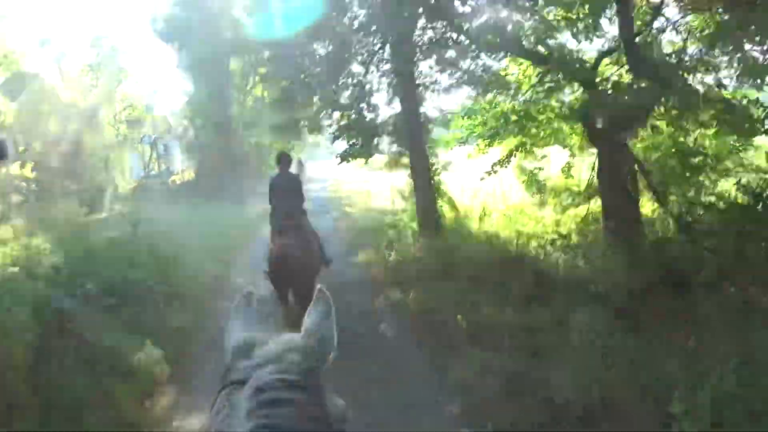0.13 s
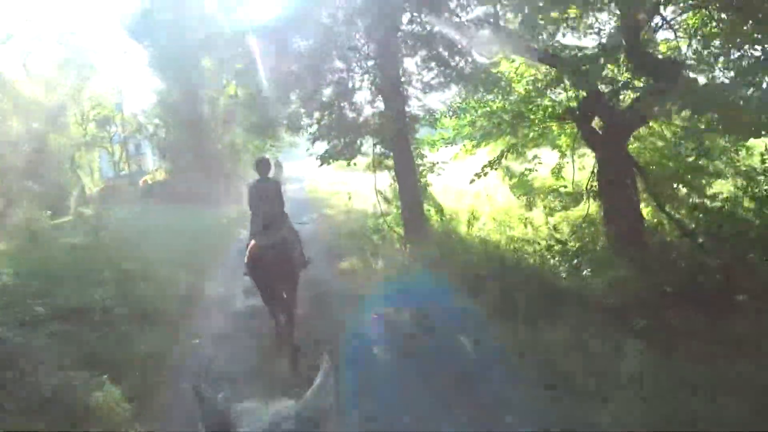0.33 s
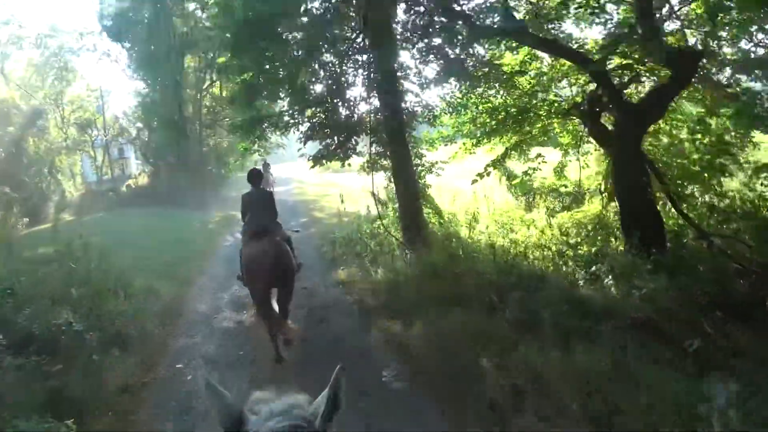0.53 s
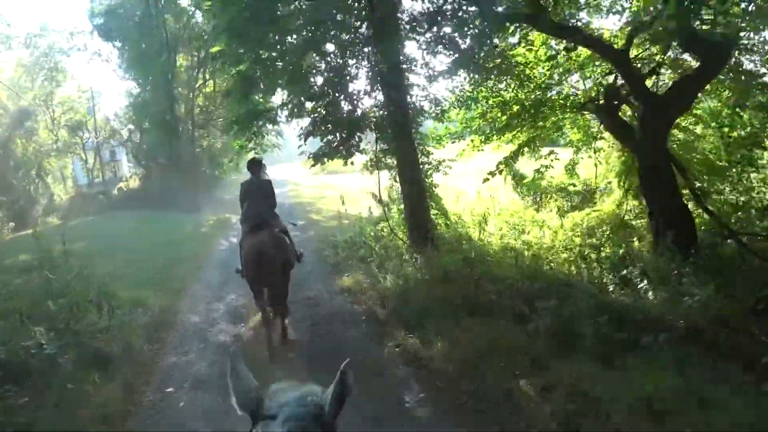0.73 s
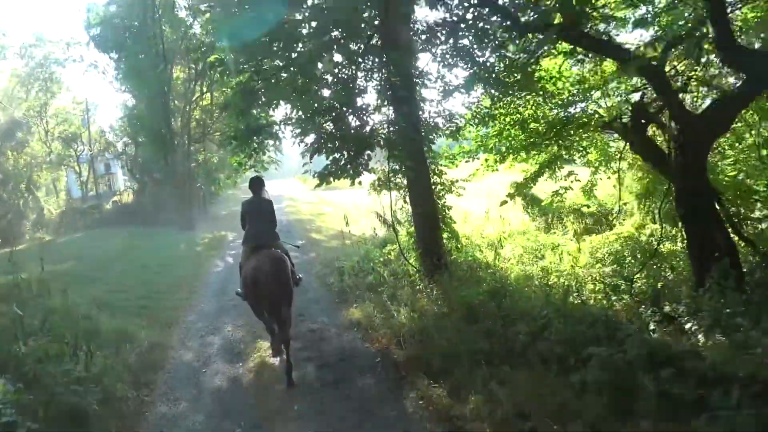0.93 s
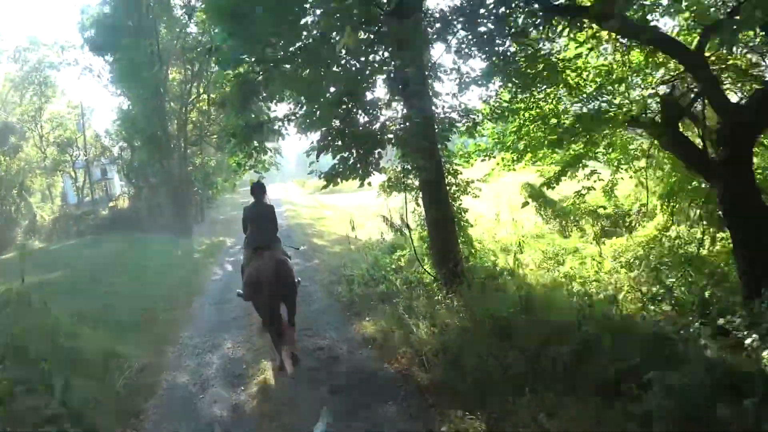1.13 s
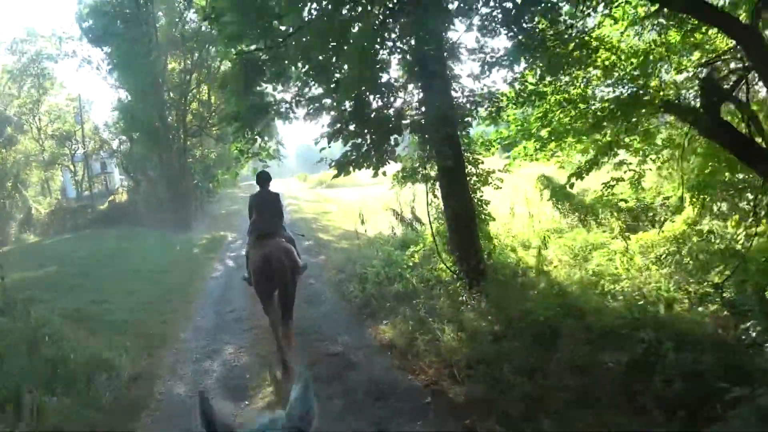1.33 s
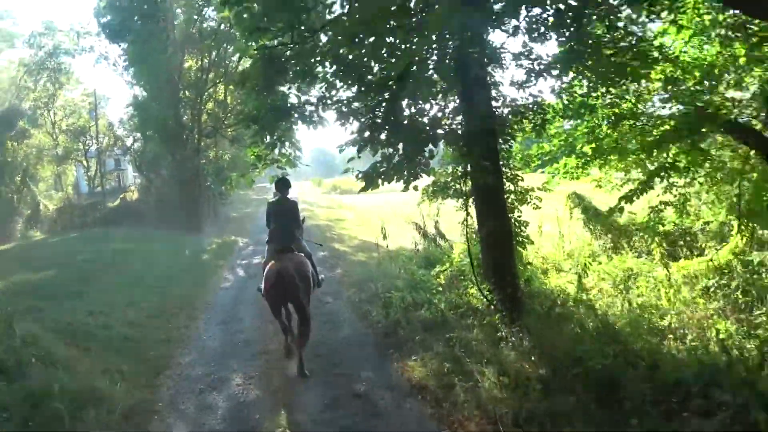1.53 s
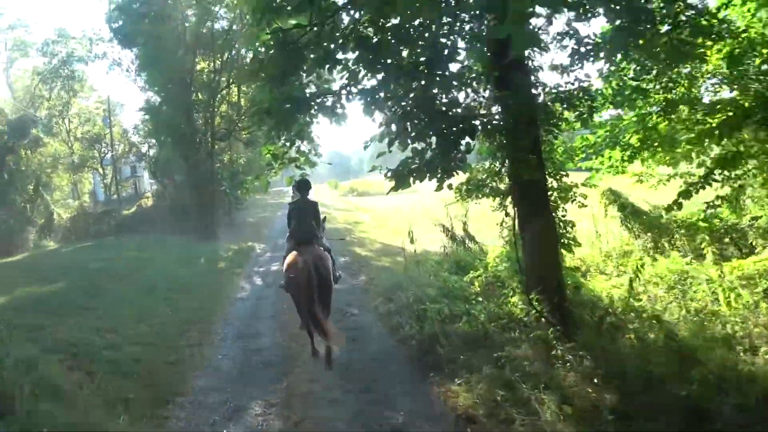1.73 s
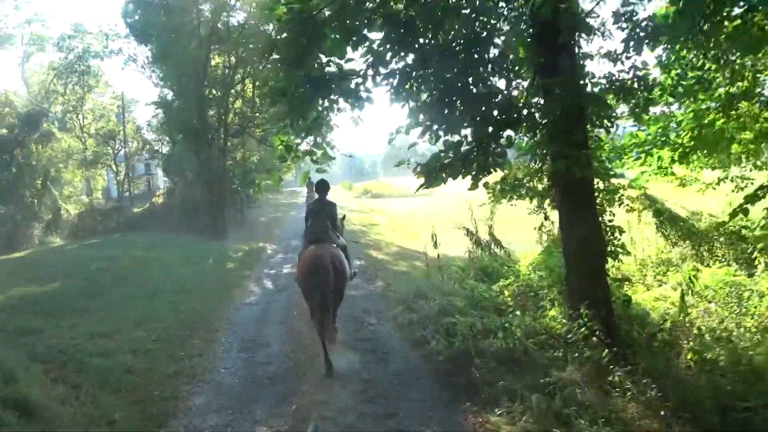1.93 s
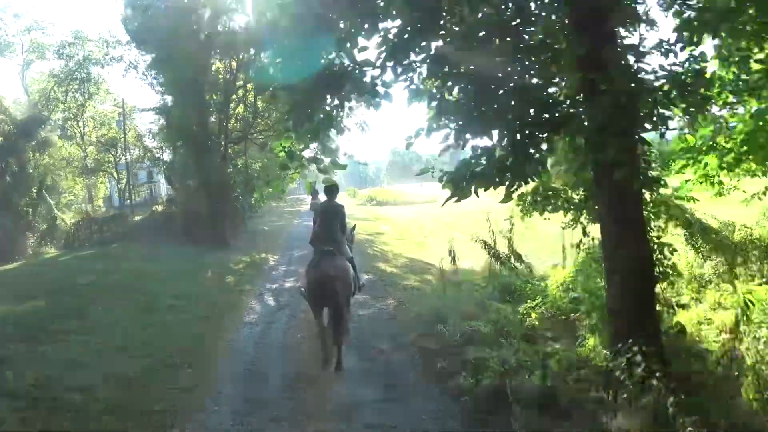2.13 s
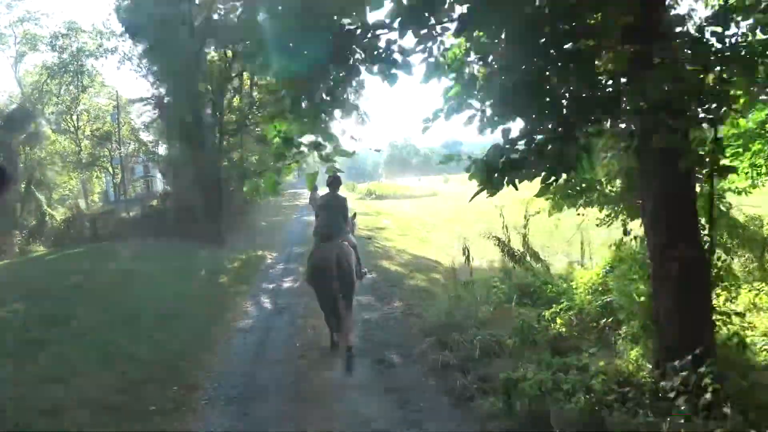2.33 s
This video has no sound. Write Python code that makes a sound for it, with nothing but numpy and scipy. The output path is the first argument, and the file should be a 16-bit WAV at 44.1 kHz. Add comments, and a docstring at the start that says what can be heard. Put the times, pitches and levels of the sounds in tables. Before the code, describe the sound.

Hoofbeats of two ridden horses crunch and knock briskly along a dirt and gravel lane

```python
"""Two horses move briskly along a dirt and gravel lane, heard from the saddle of the second.
From the start insects hiss in the trees, air and tread form a soft bed and loose gravel rolls (dense clicks).
The first knock of shoe on stone (a decaying sine and a crack) comes at once, then hooves crunch (click bursts)
and thud (low noise); from 0.4 s grit sprays and pebbles tick, and the loudest knock follows at 1.24 s.
One pebble pings at 1.6 s; a last crunch and spray close. The pair hears ground mids almost in opposite phase."""
import sys
import numpy as np
from scipy.fft import rfft, irfft
from scipy.io import wavfile
from scipy.ndimage import uniform_filter1d

SR = 44100
rng = np.random.default_rng(int(sys.argv[2]) if len(sys.argv) > 2 else 0)


def store_wav(level_fs):
    """Save 16-bit WAV to argv[1]."""
    pcm = np.round(np.clip(np.atleast_2d(level_fs), -1, 1) * 32767)
    wavfile.write(sys.argv[1], SR, pcm.T.astype(np.int16))


N = 104384
TIME = np.arange(N) / SR
HZ = np.maximum(np.arange(N // 2 + 1) * SR / N, 1)

# hooves pressing into gravel: peak t/s, level/dB, rise constant/s, fall constant/s, treble re level/dB
CRUNCHES = [(0.098, -36, 0.0058, 0.029, -25), (0.14, -33, 0.036, 0.025, -12),
            (0.181, -37, 0.034, 0.03, -21), (0.462, -37, 0.039, 0.031, -1.5),
            (0.507, -37.5, 0.01, 0.0085, -25), (0.606, -31.5, 0.0058, 0.014, -10),
            (.703, -39, 0.019, 0.037, -7), (0.795, -34.5, 0.02, 0.016, 1),
            (0.927, -30.5, 0.0086, 0.021, 0.5), (1.095, -42, 0.15, 0.008, -20),
            (1.150, -33, 0.022, 0.019, -5.5), (1.247, -36.5, 0.019, 0.027, -10),
            (1.418, -36, 0.043, 0.07, -4), (1.568, -36.5, 0.012, 0.0073, -21),
            (1.686, -38, 0.015, 0.0033, 1.5), (1.780, -30.5, 0.0084, 0.014, 0),
            (1.804, -25, 0.0048, 0.0048, -9.5), (1.835, -37.5, 0.0086, .008, 2.5),
            (1.89, -36, 0.018, 0.0098, -5), (2.037, -35.5, 0.036, 0.024, -8),
            (2.109, -31.5, 0.019, 0.016, -0.5), (2.355, -34.5, 0.029, 0.0045, 0)]
# spectrum of gravel: f/Hz, relative density/dB
GRAVEL = [(60, -65), (200, -21.5), (400, -4.5), (650, 0), (1000, 2), (1270, -3.5), (1520, -8.5),
          (2100, -9.5), (2850, -19.5), (3400, -17.5), (4100, -24), (6000, -30), (9000, -46), (16000, -78)]
TREBLE_HZ = 2050   # above it the small stones of a crunch are heard


def crunches():
    """Granular friction: each hoof grinds a burst of stones, with more or less fine gravel among them."""
    clicks = mixed_stones(count=5)
    coarse = swells([(s, db, rise, fall) for s, db, rise, fall, treble in CRUNCHES])
    fine = swells([(s, db + treble, rise, fall) for s, db, rise, fall, treble in CRUNCHES])
    low_share = 1 / (1 + (HZ / TREBLE_HZ) ** 6)
    spectrum = rfft(coarse * clicks) * low_share + rfft(fine * clicks) * (1 - low_share)
    return heard(colour(irfft(spectrum, N), GRAVEL))


# weight landing on the earth: peak t/s, level/dB, rise constant/s, fall constant/s
THUDS = [(.095, -44, 0.022, 0.0077), (.285, -45.5, 0.02, 0.039), (.612, -43, 0.021, 0.032),
         (.760, -40, 0.0087, 0.0035), (.940, -46, 0.019, 0.089), (1.102, -36.5, 0.018, 0.01),
         (1.355, -42.5, 0.037, 0.027), (1.620, -42, 0.0027, 0.0081), (1.690, -48, 0.029, 0.046),
         (1.822, -52, .015, 0.0083), (2.145, -49.5, 0.02, 0.041), (2.227, -41, 0.011, 0.0082),
         (2.256, -36.5, 0.0041, 0.014), (2.285, -41, 0.012, 0.037)]
# spectrum of packed earth: f/Hz, relative density/dB
EARTH = [(25, -90), (45, -32), (80, -13.5), (130, -5.5), (210, -2), (330, -5), (500, -12.5), (1000, -27),
         (3000, -56)]
TREAD_DB, CLODS_PER_S = -54.5, 1300   # steady rumble; rate of contacts
THUD_SCATTER_DB, THUD_LEAD_S = -6.5, 0.00062   # scattered re direct; left leads right


def thuds():
    """Low-frequency impact: dull pushes of the hooves on packed earth, over the low rumble of the ride."""
    level = np.hypot(swells(THUDS), from_db(TREAD_DB))
    earth = colour(level * grains(CLODS_PER_S, spread_db=2.5), EARTH)
    direct = pair(earth[0], 2 * np.pi * HZ * THUD_LEAD_S, 0)
    return direct + from_db(THUD_SCATTER_DB) * earth[1:]


# a shoe knocks a stone or hard earth: onset t/s, level/dB, f/Hz, rise/cycles, crack re level/dB
KNOCKS = [(.0435, -27, 730, 1.2, -4), (.0925, -31.5, 636, 1.9, -29), (.1445, -24.5, 1200, 2, -17),
          (0.178, -25.5, 1290, 2.6, -28), (.286, -29, 1030, 0.62, -3), (.305, -28.5, 1870, 1, -3),
          (.3146, -28, 840, 1.4, -14), (.4555, -29, 610, 0.87, -11), (.6045, -26, 590, 0.87, -15),
          (.9222, -24, 1080, 1.7, -11), (.9335, -26, 660, 1.6, -15), (1.209, -31, 720, 1.2, -14),
          (1.2372, -13.5, 915, 1.23, -14.5), (1.244, -27, 750, 2.5, -4), (1.7738, -21, 1190, 1.9, -4),
          (1.779, -22, 1050, 1.5, -17), (1.7825, -22, 770, 1, -21), (1.8042, -35, 870, 0.73, -25),
          (1.864, -26.5, 810, 1.1, -20), (1.9036, -20, 449, 0.68, -7), (2.1065, -25.5, 764, 2.3, -22),
          (2.198, -26, 765, 1.06, -17), (2.288, -28.5, 323, 0.46, -13)]
# spectrum of the crack: f/Hz, relative density/dB
CRACK = [(200, 4), (900, 24), (4500, 10.5), (7000, 5.5), (16000, -26)]
CRACK_S = 0.00068   # decay constant


def knocks():
    """Damped resonance: a hoof on something hard gives a short crack and a hollow clop of a few cycles."""
    clops, cracks = np.zeros(N), np.zeros(N)
    for s, db, hz, rise_cycles, crack_db in KNOCKS:
        age = np.maximum(TIME - s, 0)
        swell = age * hz / rise_cycles
        envelope = (swell * np.exp(1 - swell)) ** 2   # reaches 1 after rise_cycles
        clops += from_db(db) * envelope * np.sin(2 * np.pi * hz * age)
        cracks += from_db(db + crack_db) * (age > 0) * np.exp(-age / CRACK_S)
    return from_ground(clops + colour(cracks * rng.standard_normal(N), CRACK))


LOOSE_DB, LOOSE_PER_S, LOOSE_SPREAD_DB = -46.5, 1500, 0


def loose_gravel():
    """Stationary random contacts: loose gravel keeps rolling between steps."""
    return stones(from_db(LOOSE_DB), GRAVEL, LOOSE_PER_S, LOOSE_SPREAD_DB)


# grit sprays from under a hoof: peak t/s, level/dB, rise constant/s, fall constant/s
SPRAYS = [(.440, -51, .008, 0.042), (.606, -58.5, .008, 0.023), (.790, -56, 0.018, 0.054),
          (.915, -51.5, 0.0025, 0.048), (1.041, -54, 0.001, 0.031), (1.115, -53.5, 0.045, 0.053),
          (1.250, -60, 0.0074, 0.28), (1.408, -50, 0.012, 0.035), (1.575, -54.5, 0.05, 0.044),
          (1.665, -56, 0.068, 0.058), (1.759, -52, 0.016, 0.068), (2.100, -57.5, 0.12, 0.07),
          (2.250, -54, 0.023, 0.017), (2.355, -55, 0.019, 0.0091)]
# spectrum of fine grit: f/Hz, relative density/dB
GRIT = [(1000, -6), (3300, 9), (4500, 4), (7000, 3.5), (9000, -3), (11300, 4.5), (13000, 0), (16000, -0.5)]
GRIT_PER_S, GRIT_SPREAD_DB = 650, 2.5


def sprays():
    """Impact statistics: thrown grit is a swelling train of bright random clicks."""
    return stones(swells(SPRAYS), GRIT, GRIT_PER_S, GRIT_SPREAD_DB)


ROLL_DB, ROLLS_PER_S, ROLL_SPREAD_DB = -51.5, 45, 3.5


def turning_stones():
    """Sparse impulse process: single larger stones turn over."""
    return from_db(ROLL_DB) * lone_stones(GRAVEL, ROLLS_PER_S, ROLL_SPREAD_DB)


# ticks of flying pebbles: onset t/s, level before TICK_DB/dB
TICKS = [(.4354, -48), (0.4574, -41), (0.912, -33), (0.923, -37), (1.04, -41), (1.2465, -41), (1.4426, -38),
         (1.5973, -33.5), (1.629, -36), (1.671, -34), (1.756, -31.5), (1.969, -37), (2.0472, -49),
         (2.2458, -40), (2.2548, -40)]
# spectrum of a pebble: f/Hz, relative density/dB
PEBBLE = [(1500, 3), (5000, -1), (8700, 7), (10500, 0), (14000, 5), (16000, 1)]
TICK_DB, TICK_S = -4.5, .0008   # gain on all ticks; decay constant
PING_AT_S, PING_DB, PING_HZ, PING_FALL_S = 1.5975, -42, 8650, .0025


def ticks():
    """Brief contact radiates high frequencies: pebbles strike with short bright ticks; one also pings."""
    level = sum(from_db(db + TICK_DB) * (TIME > s) * np.exp(-abs(TIME - s) / TICK_S) for s, db in TICKS)
    age = np.maximum(TIME - PING_AT_S, 0)
    ping = from_db(PING_DB) * np.exp(-age / PING_FALL_S) * np.sin(2 * np.pi * PING_HZ * age)
    return from_ground(colour(level * rng.standard_normal(N), PEBBLE) + ping)


# spectrum of the insect chorus: f/Hz, relative density/dB
INSECTS = [(3000, -53), (5700, -21), (6400, 5.5), (6750, 2.5), (7150, 2.5), (7800, -7.5), (8800, -13.5),
           (16000, -37)]
INSECT_DB, INSECT_PAN_DB, INSECT_SCATTER_DB = -60.5, -8.5, -3   # pan is left re right
INSECT_PULSE_HZ, INSECT_PULSE_DEPTH = 110.2, 0.12


def insects():
    """Amplitude modulation: narrow-band noise pulses with a drifting phase, in the trees on the right."""
    drift = np.cumsum(rng.normal(0, 0.02, N))
    pulse = 1 + INSECT_PULSE_DEPTH * np.sin(2 * np.pi * INSECT_PULSE_HZ * TIME + drift)
    chorus = colour(pulse * rng.standard_normal((3, N)), INSECTS)
    direct = pair(chorus[0], 0, INSECT_PAN_DB)
    scattered = from_db(INSECT_SCATTER_DB) * chorus[1:] * from_db([[INSECT_PAN_DB / 2], [0]])
    return from_db(INSECT_DB) * (direct + scattered)


# spectrum of the air: f/Hz, relative density/dB
AIR = [(25, -4), (70, 15.5), (200, 13), (600, 2), (1500, 1), (2400, -19), (3000, -16.5), (6000, -6),
       (9000, -10), (11500, -3.5), (16000, -8.5)]
AIR_DB, AIR_SCATTER_DB = -61, -9


def air():
    """Partial coherence: a soft bed of noise, mostly common to both sides."""
    noise = colour(rng.standard_normal((3, N)), AIR)
    return from_db(AIR_DB) * (noise[0] + from_db(AIR_SCATTER_DB) * noise[1:])


STONES_PER_S, STONE_SPREAD_DB = 1100, 2
BIG_STONE_HZ, SIZE_STEP_OCTAVES = 510, 0.767   # band of the largest stones; step to each smaller size


def mixed_stones(count):
    """Size sets pitch: stones of several sizes slip independently, each size in its own band."""
    size = np.clip(np.log2(HZ / BIG_STONE_HZ) / SIZE_STEP_OCTAVES, 0, count - 1)
    spectrum = 0
    for k in range(count):
        band = np.cos(np.pi / 2 * np.clip(size - k, -1, 1))   # neighbours overlap at constant power
        spectrum = spectrum + rfft(grains(STONES_PER_S, STONE_SPREAD_DB)) * band
    return irfft(spectrum, N)


def stones(level, spectrum, per_s, spread_db):
    """Superposition: dense stone contacts under a level curve."""
    return heard(colour(level * grains(per_s, spread_db), spectrum))


def lone_stones(spectrum, per_s, spread_db):
    """Impulse response: sparse single contacts of uneven size, rms about one."""
    sizes = from_db(spread_db * np.minimum(rng.exponential(1, N), 3)) * rng.choice([-1, 1], N)
    clicks = sizes * (rng.random(N) < per_s / SR)
    return from_ground(colour(rms_one(clicks), spectrum))


EVEN_S = .008   # time over which the mean level of the click trains is evened out


def grains(per_s, spread_db):
    """Shot noise: three click trains (direct, scattered left, scattered right) with an even mean level."""
    sizes = from_db(spread_db * np.minimum(rng.exponential(1, (3, N)), 4)) * rng.choice([-1, 1], (3, N))
    clicks = sizes * (rng.random((3, N)) < per_s / SR)
    clicks = clicks + 0.055 * rng.standard_normal((3, N))   # faint noise between clicks
    power = uniform_filter1d(clicks ** 2, max(int(EVEN_S * SR), 2), axis=1)
    return clicks / np.sqrt(power + 1e-9)


def swells(rows):
    """Energy addition: contacts rise and fall exponentially and their powers add."""
    power = 0
    for s, db, rise, fall in rows:
        decay = np.maximum((s - TIME) / rise, (TIME - s) / fall)
        power = power + (from_db(db) * np.exp(-decay)) ** 2
    return np.sqrt(power)


# scattered share of the stone sounds: f/Hz, level re direct/dB
SCATTER = [(300, -5.5), (700, -15), (1200, -12), (1600, -5), (2350, -14.5), (2750, -2), (3400, -7.5),
           (5000, 3.5), (9000, 3.5), (13000, -5.5)]


def heard(x):
    """Direct and diffuse field: sound of the stones plus what is scattered to each side."""
    gains = from_db(at_hz(SCATTER)) * sides(at_hz(PAIR_BALANCE))
    return from_ground(x[0]) + irfft(rfft(x[1:]) * gains, N)


# microphone pair, for sound from the ground: f/Hz, phase by which left leads/rad
PAIR_PHASE = [(80, 1), (230, 4), (400, 4), (1200, 3.5), (1500, 4), (1800, 3.5), (2350, 3), (3900, 3.5),
              (5100, 3.5), (6000, 0.9), (8000, 1.5), (11000, 0.6), (16000, -1.5)]
# the same pair: f/Hz, left re right level/dB
PAIR_BALANCE = [(230, 0.5), (480, 4), (750, 2), (1150, 1), (1420, -2), (1650, 3.5), (2350, -0.5),
                (2850, -3), (3250, -2), (4800, -10.5), (7800, -2.5), (9200, -6), (12000, -.5), (16000, -3)]


def from_ground(x):
    """Interchannel phase and level: a sound from the lane as the microphone pair hears it."""
    return pair(x, at_hz(PAIR_PHASE), at_hz(PAIR_BALANCE))


def pair(x, lead, pan_db):
    """Stereophony: left and right from one sound, with a phase lead and a level difference."""
    turn = np.exp(np.array([[.5j], [-.5j]]) * lead)
    return irfft(rfft(x) * sides(pan_db) * turn, N)


def sides(pan_db):
    """Constant-power panning: left and right gains of even total power."""
    gains = from_db(np.array([[.5], [-.5]]) * pan_db)
    return gains / np.sqrt(np.mean(gains ** 2, axis=0))


def colour(x, spectrum):
    """Linear filtering: shape by a spectrum, keeping the power of white input."""
    return irfft(rfft(x) * rms_one(from_db(at_hz(spectrum))), N)


def at_hz(points):
    """Logarithmic pitch scale: read a table over log frequency."""
    hz, value = np.transpose(points)
    return np.interp(np.log(HZ), np.log(hz), value)


def rms_one(x):
    """Effective value: scale to unit rms."""
    return x / np.sqrt(np.mean(x ** 2) + 1e-20)


def from_db(db):
    """Logarithmic level: decibels to amplitude gain."""
    return 10 ** (np.asarray(db) / 20)


def scene():
    """Superposition: hooves on the lane among summer trees."""
    hooves = crunches() + thuds() + knocks()
    debris = loose_gravel() + sprays() + turning_stones() + ticks()
    return hooves + debris + insects() + air()


CUTOFF_HZ = 15800


def record(dry):
    """Band limitation: the top is cut steeply."""
    return irfft(rfft(dry) / np.sqrt(1 + (HZ / CUTOFF_HZ) ** 300), N)


dry = scene()
out = record(dry)
store_wav(out)
```